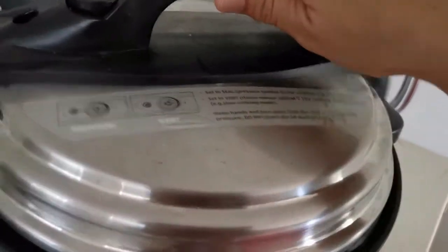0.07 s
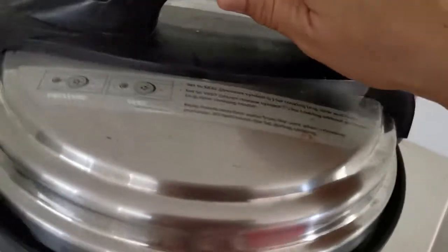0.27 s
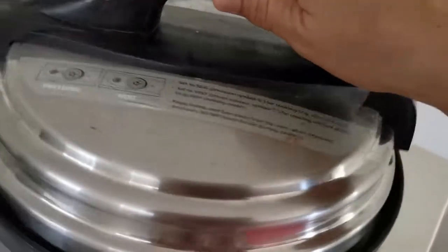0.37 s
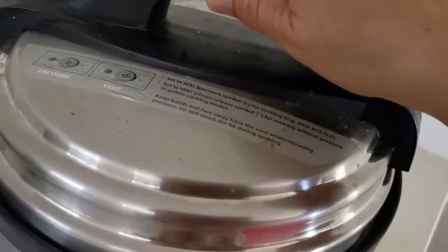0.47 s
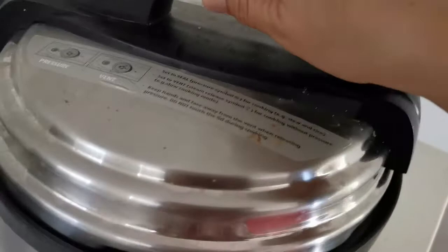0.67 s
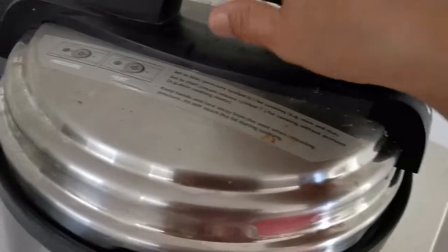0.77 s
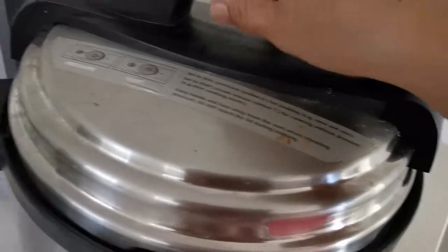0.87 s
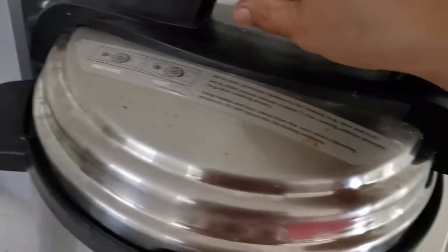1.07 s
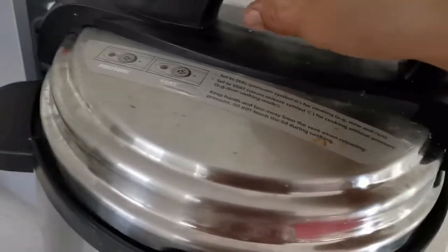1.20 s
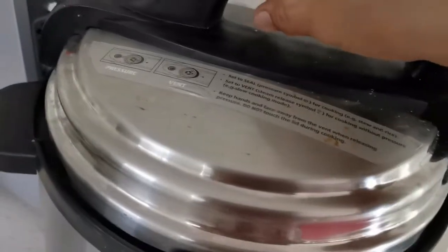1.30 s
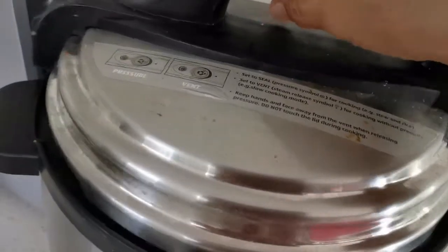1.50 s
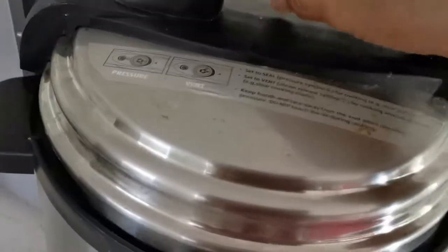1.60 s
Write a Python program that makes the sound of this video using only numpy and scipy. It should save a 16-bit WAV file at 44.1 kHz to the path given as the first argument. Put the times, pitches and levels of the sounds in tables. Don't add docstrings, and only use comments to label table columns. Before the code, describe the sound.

Close up, a metal cooker lid unlocks with rapid rattling clacks, then a catch clicks and the lid knocks hard; echo fades into low hum and hiss, with faint ticks and a light tap late.

```python
import sys
import numpy as np
from scipy import signal
from scipy.fft import rfft, irfft, next_fast_len
from scipy.io import wavfile
from scipy.ndimage import uniform_filter1d

SR = 44100
rng = np.random.default_rng(int(sys.argv[2]) if len(sys.argv) > 2 else 0)


def to_wav(sig):
    pcm = np.clip(np.atleast_2d(sig), -1, 1) * 32767
    pcm = np.round(pcm).astype(np.int16)
    wavfile.write(sys.argv[1], SR, pcm.T)


def ratio_of_db(decibels):
    return 10 ** (np.asarray(decibels, float) / 20)


N = 72765

# f/Hz, density [dB per Hz]; then f/Hz, left-right likeness [0-1]
AIR = [(40, -8), (212, -6.5), (695, -17.5), (2200, -26.5), (5000, -38.5), (7600, -35), (10500, -42),
       (14000, -38.5)]
AIR_ALIKE = [(60, 0.8), (240, 0.97), (950, 0.85), (3770, 0.36), (15000, 0.43)]
AIR_DB = -57.5
HUM_HZ, HUM_WIDTH_HZ, HUM_DB, HUM_FADE_DB_PER_S = 67.3, 5.1, -60.5, 3.5
# t/s, level/dB
NOISE_FILTER = [
    (0, -6),
    (.2, -8.5),
    (.3, 10.5),
    (1.1, 0),
    (1.4, -6),
    (1.65, -4.5),
]
NOISE_FILTER_FROM_HZ = 900

# t/s, pot level/dB, touched part level/dB, rim level/dB, chatter [s]
UNLOCK = [
    (.216, -44, -54.5, -54, 0.0016),
    (.2263, -32, -25, -32, 0.0052),
    (.2325, -25, -33.5, -46.5, 0.0049),
    (.242, -38.5, -38, -51.5, 0.0033),
]
TURN = [(.2562, -42, -39, -46.5, 0.0024), (.2595, -36.5, -36, -32, 0.01), (.2795, -38, -25, -34, 0.0039),
        (.2808, -31.5, -14, -26.5, 0.0035), (.2912, -27.5, -13, -21.5, 0.004),
        (.2975, -29.5, -20.5, -19, 0.0037), (.3015, -45, -33.5, -34, 0.008),
        (.3145, -23.5, -45.5, -28.5, 0.0027), (.331, -44, -28.5, -38.5, .004),
        (.339, -36.5, -37.5, -37.5, .005), (.345, -47, -33.5, -35, 0.006), (.3515, -45, -23.5, -31, 0.004),
        (.358, -40, -29.5, -38, .004), (.398, -44, -47.5, -54.5, 0.012)]
CATCH = [
    (.5206, -73.5, -34.5, -31.5, 0.0058),
    (.5585, -66, -43, -46.5, 0.0017),
    (.5605, -57.5, -26.5, -23, 0.013),
    (.584, -57, -30, -45, .004),
    (.5949, -34, -33.5, -22.5, 0.0038),
]
STOP = [
    (.6015, -46.5, -27.5, -47, 0.0054),
    (.609, -28, -25, -47, 0.0061),
    (.6128, -16.5, -9, -19.5, 0.0045),
    (.6158, -17, -7.5, -24, 0.0025),
    (.619, -22.5, -15.5, -40.5, 0.0042),
]
LATE = [(.985, -56, -59.5, -67, 0.013), (1.0874, -70, -56, -61, 0.0056), (1.1333, -65, -79, -59, 0.0067),
        (1.3418, -79, -62, -72, 0.0072), (1.4256, -71.5, -64.5, -83, 0.0071), (1.436, -98, -83, -65, 0.011),
        (1.495, -82, -76, -64, 0.0032), (1.5188, -53.5, -31.5, -51.5, 0.0027),
        (1.5225, -55.5, -42.5, -68.5, 0.0035), (1.573, -79, -68.5, -63, .003),
        (1.612, -52.5, -51, -82, 0.0046)]
RISE_S, POT_SLOWER, STRIKE = 0.0004, 2, 2.2
EVEN = 0.89
FORCE_ALIKE = [.99, 0.76, 0.066]

# t/s, pressure level/dB
LUG_RUB = [
    (.225, -80.5),
    (.24, -39),
    (.3, -55),
    (.35, -44),
    (.42, -89),
    (.55, -54.5),
    (.6, -31.5),
    (.66, -100),
]
# t/s, pressure level/dB
PALM = [
    (1.31, -89.5),
    (1.35, -61.5),
    (1.375, -110),
    (1.52, -66.5),
    (1.56, -65.5),
    (1.61, -60.5),
    (1.65, -57),
]
LUG_RIM_DB, PALM_RIM_DB, GRAINS_PER_S = -5.5, -12, 7100

# f/Hz, width [Hz], level/dB Pot as the lock pin lets go
POT_FREE = [(78, 12, -10), (173.5, 36, 2), (296, 110, -6), (491, 38, -5.5), (694, 35, -9.5)]
POT_HELD = [(80.6, 14, -16.5), (175, 8.3, 2.5), (246, 24, 3), (357, 120, -4), (470, 13, -11),
            (646, 50, -5.5)]
POT = [(86, 8, -6.5), (175.7, 33, 1), (272, 35, -1), (402.5, 43, -1.5), (510, 82, -10), (658, 87, -6),
       (735, 34, -5.5)]
PIN = [(1090, 150, -8), (1460, 71, -10.5), (2370, 290, -12), (2880, 200, -2), (3170, 180, -7),
       (3750, 500, -17.5)]
HANDLE = [(1015, 75, -1.5), (1126, 92, -0.5), (1590, 230, -9.5), (1880, 140, -2.5), (2137, 230, -6),
          (2560, 230, -2.5), (2800, 210, 0.5), (3350, 300, -8.5), (3750, 440, -13.5)]
SPRING = [(1282, 560, -8.5), (2015, 240, -1), (2770, 320, -6), (3430, 220, -7), (9600, 260, -10),
          (11500, 2300, -19.5), (14980, 860, -19.5)]
LID = [(837, 150, 3), (910.5, 61, 3.5), (1070, 98, -2.5), (1185, 100, 6.5), (1324, 330, -1.5),
       (1620, 73, -14), (1886, 160, -1), (2087, 170, 2.5), (2353, 300, -6.5), (2700, 540, -5),
       (3668, 180, -8.5), (4380, 230, -12.5)]
KNOB = [(930, 75, -3), (1231, 73, 6.5), (2092, 88, 3.5), (2360, 106, -0.5), (2594, 160, -4.5),
        (2950, 160, -10), (3470, 220, -10), (5300, 240, -27), (5940, 610, -20)]
RIM = [(4310, 250, -5.5), (4650, 200, -2), (5490, 670, -1), (6450, 67, 2.5), (7060, 430, -1),
       (7630, 280, 1.5), (7920, 330, -1.5), (9880, 410, -7), (11600, 2900, -22), (14470, 1200, -23.5)]

# f/Hz, time to fall 60 dB [s]
KITCHEN = [(100, .9), (400, 0.78), (1000, 1), (3000, 0.71), (6000, 0.75), (9000, 0.39), (14000, 0.5)]
# f/Hz, level/dB; then f/Hz, left-right likeness [0-1]
WET = [(100, 0), (300, -5.5), (800, -2.5), (2000, -6), (5000, -4), (8500, -1.5), (10500, -7.5), (14000, -7)]
WET_ALIKE = [(60, 1), (180, 1), (550, 0.96), (1650, 0.74), (4970, 0.11), (15000, 1)]
KNEE_S, KNEE_DB_PER_S, FIRST_ECHO_S = 0.24, 73.5, 0.005
SHIFTS_PER_S = 30
BLUR_FROM_HZ, BLUR_HZ, BLUR_DB = 600, 262, 5

LEFT_DB = [-3.5, -3, 1, -0.5, 1.5]
# f/Hz, left over right level/dB
LEAN = [(100, 1.5), (1200, 2), (2800, 1.5), (5000, 1.5), (9000, 1.5), (14000, 4)]
# f/Hz, level/dB
MICROPHONE = [(20, 0), (60, -2.5), (8200, 1.5), (9300, -8.5), (11000, -8.5), (15500, -12), (16300, -43)]
GATE_FROM_HZ, GATE_BELOW_DB, GATE_UNEVEN_DB = 9300, -60, 7


def unit(x):
    return x / np.sqrt(np.mean(x ** 2) + 1e-20)


def along(points, hz):
    f, value = np.transpose(points)
    return np.interp(np.log(hz + 1), np.log(f + 1), value)


def curve(rows):
    t, value = np.transpose(rows)
    return np.interp(np.arange(N) / SR, t, value)


def filtered(x, response):
    size = next_fast_len(x.shape[-1] + SR // 2)
    hz = np.fft.rfftfreq(size, 1 / SR)
    return irfft(rfft(x, size) * response(hz), size)[..., :x.shape[-1]]


def pair(size, spectrum, alike):
    def response(hz):
        turn = np.arccos(np.clip(along(alike, hz), -1, 1)) / 2
        return ratio_of_db(along(spectrum, hz)) * [np.cos(turn), np.sin(turn)]

    mid, side = filtered(rng.standard_normal((2, size)), response)
    return np.array([mid + side, mid - side])


def room_tone():
    air = ratio_of_db(AIR_DB) * unit(pair(N, AIR, AIR_ALIKE))
    treble = filtered(air, lambda hz: 1 / (1 + (NOISE_FILTER_FROM_HZ / (hz + 1)) ** 2))
    air = air + treble * (ratio_of_db(curve(NOISE_FILTER)) - 1)
    hum = unit(filtered(rng.standard_normal(N), lambda hz: np.exp(-((hz - HUM_HZ) / HUM_WIDTH_HZ) ** 2)))
    hum_db = HUM_DB + 3.5 - HUM_FADE_DB_PER_S * np.arange(N) / SR
    return air + ratio_of_db(hum_db) * hum


def body(force, modes):
    def response(f):
        total = 0
        for k, (centre, width, db) in enumerate(modes):
            damping = 1j * f * width
            total = total + (-1) ** k * ratio_of_db(db) * damping / (centre * centre - f * f + damping)
        return total

    power = np.mean(abs(response(np.linspace(1, SR / 2, 8000))) ** 2)
    return filtered(force, response) / np.sqrt(power)


def contacts(table, modes, pot=POT):
    force = np.zeros((3, 2, N + SR))
    t = np.arange(SR // 10) / SR
    turn = np.arccos(np.clip(FORCE_ALIKE, -1, 1))[:, None] / 2
    for s, pot_db, part_db, rim_db, chatter in table:
        lasts = max(chatter, .001) * np.array([[POT_SLOWER], [1], [1]])
        cutoff = np.exp(-(t / lasts / 2) ** 2)
        shape = (1 - np.exp(-t / RISE_S)) * np.exp(-t / lasts) * cutoff
        mid, side = shape * rng.standard_normal((2, 3, len(t)))
        spectrum = rfft(mid)
        mid = irfft(spectrum / abs(spectrum) ** np.clip(EVEN, 0, 1), len(t)) * cutoff
        mid = mid / np.linalg.norm(mid, axis=1, keepdims=True)
        mid = mid * np.linalg.norm(shape, axis=1, keepdims=True) + STRIKE * (t == 0)
        mid, side = np.cos(turn) * mid, np.sin(turn) * side
        both = np.stack([mid + side, mid - side], axis=1)
        level = ratio_of_db([pot_db, part_db, rim_db])[:, None, None]
        force[..., round(s * SR):][..., :len(t)] += level * both
    on_pot, on_part, on_rim = force[..., :N]
    return body(on_pot, pot) + body(on_part, modes) + body(on_rim, RIM)


def unlocking():
    return contacts(UNLOCK, PIN, POT_FREE)


def rubbing(pressure, modes, rim_db):
    grains = rng.random((3, N)) < GRAINS_PER_S / SR
    grit = grains * rng.standard_normal((3, N)) * rng.exponential(1, (3, N))
    force = ratio_of_db(curve(pressure)) * unit(grit)
    return body(force[0], modes) + ratio_of_db(rim_db) * body(force[1:], RIM)


def turning():
    return contacts(TURN, HANDLE, POT_HELD) + rubbing(LUG_RUB, HANDLE, LUG_RIM_DB)


def catching():
    return contacts(CATCH, SPRING)


def stopping():
    return contacts(STOP, LID)


def hand_shifting():
    return contacts(LATE, KNOB) + rubbing(PALM, LID, PALM_RIM_DB)


def blurred(x):
    high = filtered(x, lambda hz: 1 / (1 + (BLUR_FROM_HZ / (hz + 1)) ** 4))
    flutter = unit(filtered(rng.standard_normal(N), lambda hz: np.exp(-(hz / BLUR_HZ) ** 2)))
    return x - high + high * (1 + ratio_of_db(BLUR_DB) * flutter) / np.sqrt(1 + ratio_of_db(2 * BLUR_DB))


def kitchen(x):
    wet = 0
    drift = np.pi * SHIFTS_PER_S * np.arange(N) / SR
    delayed = np.pad(x, (round(FIRST_ECHO_S * SR), 0))[None]
    for share in (np.cos(drift), np.sin(drift)):
        hz, t, z = signal.stft(pair(SR, WET, WET_ALIKE), SR, nperseg=256)
        fall_db = -60 * t / along(KITCHEN, hz)[:, None] - KNEE_DB_PER_S * np.maximum(t - KNEE_S, 0)
        tail = signal.istft(z * ratio_of_db(fall_db), SR, nperseg=256)[1] / np.sqrt(SR / 20)
        wet = wet + share * signal.fftconvolve(delayed, tail, axes=1)[:, :N]
    return wet


def scene():
    parts = [unlocking(), turning(), catching(), stopping(), hand_shifting()]
    side = np.array([[.5], [-.5]])
    near = sum(ratio_of_db(db * side) * part for part, db in zip(parts, LEFT_DB))
    near = near + kitchen(blurred(near.mean(axis=0)))
    return filtered(near, lambda hz: ratio_of_db(along(LEAN, hz) * side)) + room_tone()


def gated(x):
    hz, _, z = signal.stft(x, SR, nperseg=1024)
    power = np.mean(abs(z) ** 2, axis=0)
    uneven = uniform_filter1d(rng.standard_normal(power.shape), size=6, axis=0)
    uneven = unit(uniform_filter1d(uneven, size=4, axis=1))
    limit = power.sum(axis=0) * ratio_of_db(2 * (GATE_BELOW_DB + GATE_UNEVEN_DB * uneven)) + 1e-20
    smooth = np.abs(uniform_filter1d(power, size=4, axis=0)) + 1e-20
    keep = np.where(hz[:, None] > GATE_FROM_HZ, 1 / (1 + (limit / smooth) ** 3), 1)
    return signal.istft(z * keep, SR, nperseg=1024)[1][:, :N]


def band_limit(x):
    return signal.sosfilt(signal.butter(12, 16310, fs=SR, output="sos"), x)


def record(dry):
    heard = filtered(dry, lambda hz: ratio_of_db(along(MICROPHONE, hz)))
    mix = gated(heard)
    return band_limit(mix)


dry = scene()
out = record(dry)
to_wav(out)
```